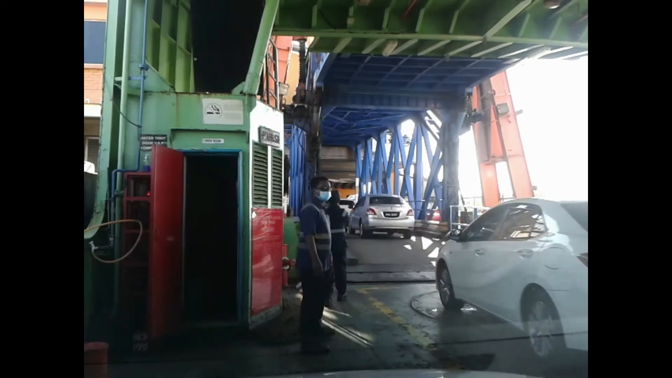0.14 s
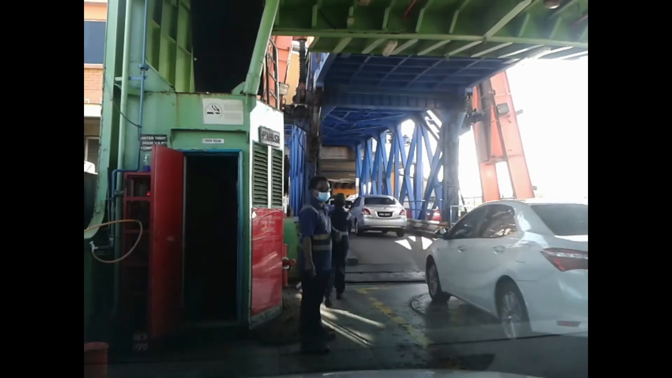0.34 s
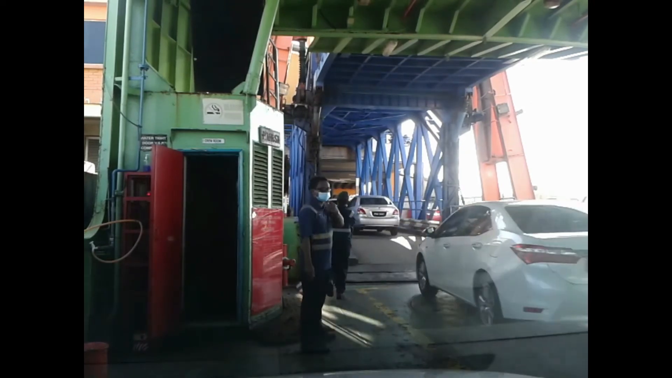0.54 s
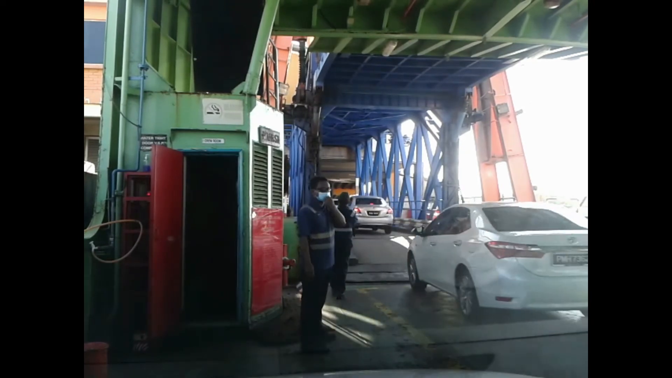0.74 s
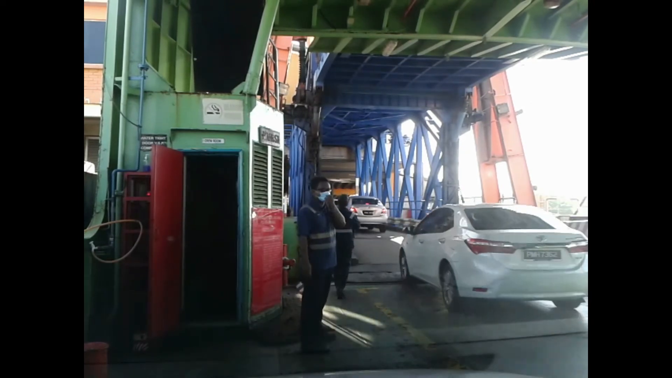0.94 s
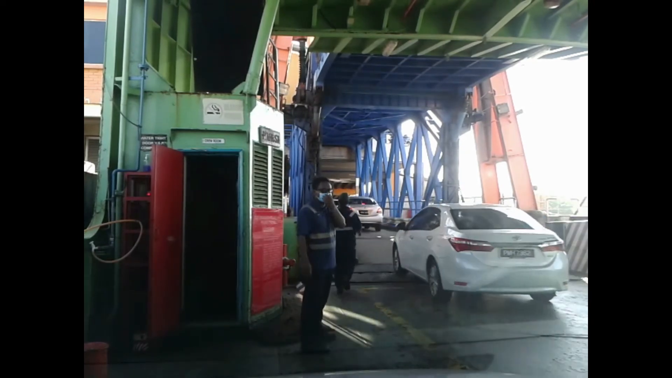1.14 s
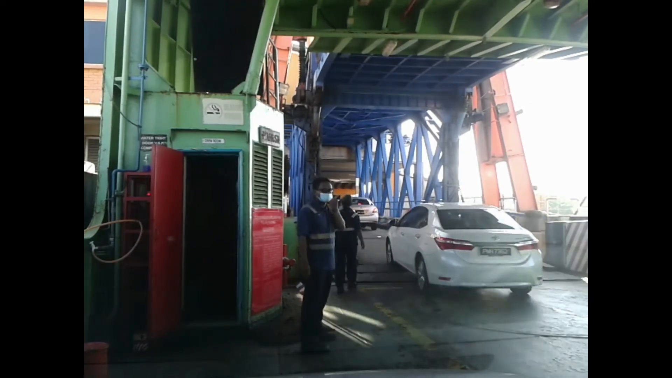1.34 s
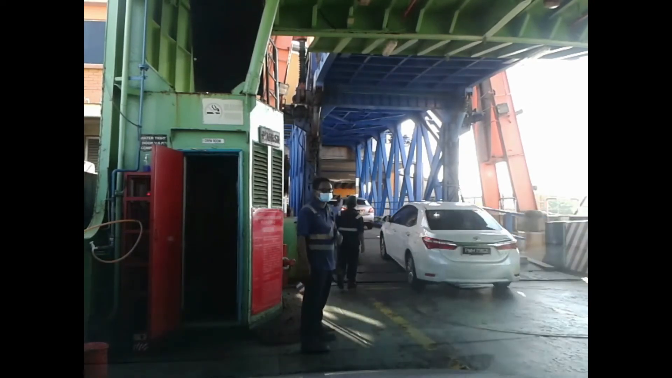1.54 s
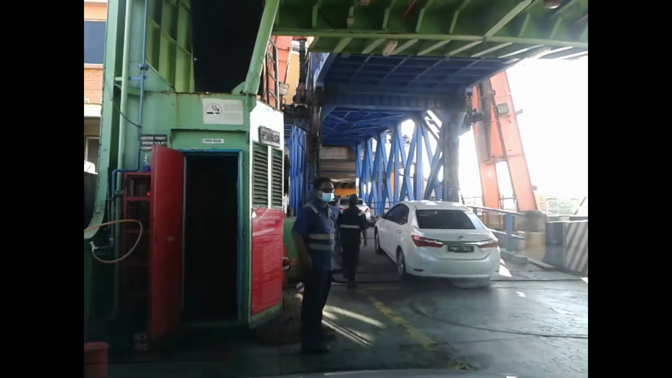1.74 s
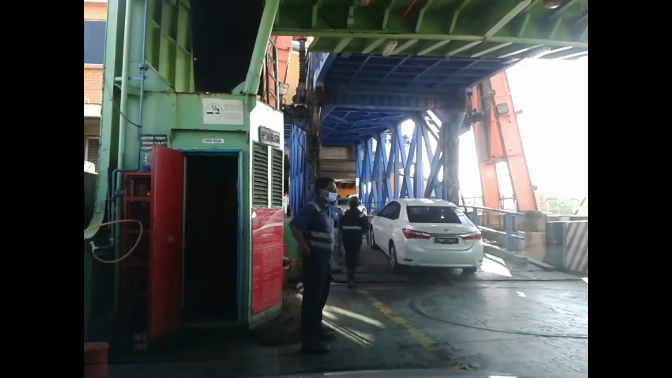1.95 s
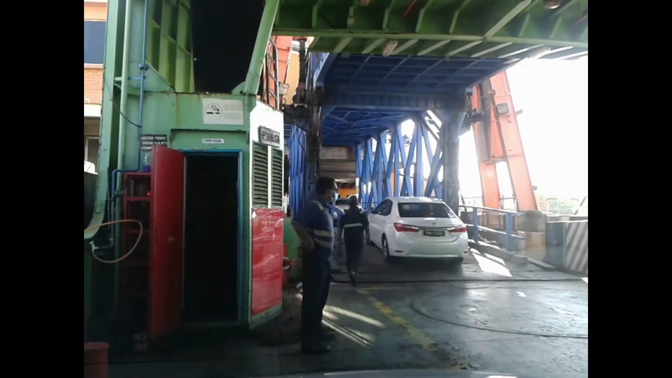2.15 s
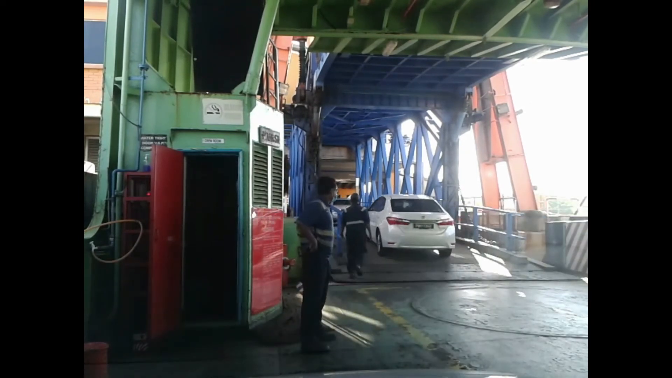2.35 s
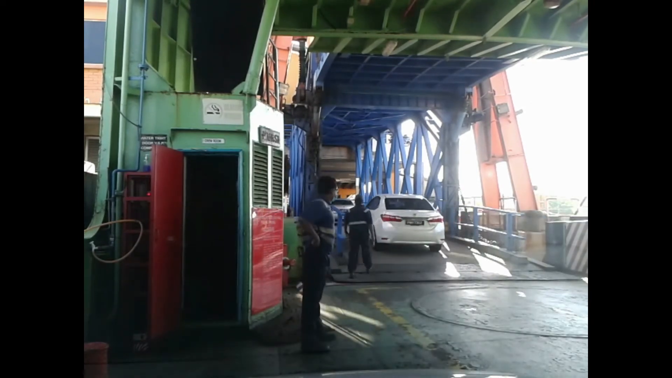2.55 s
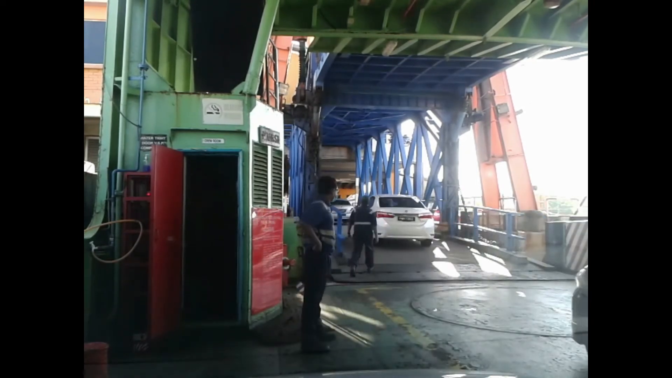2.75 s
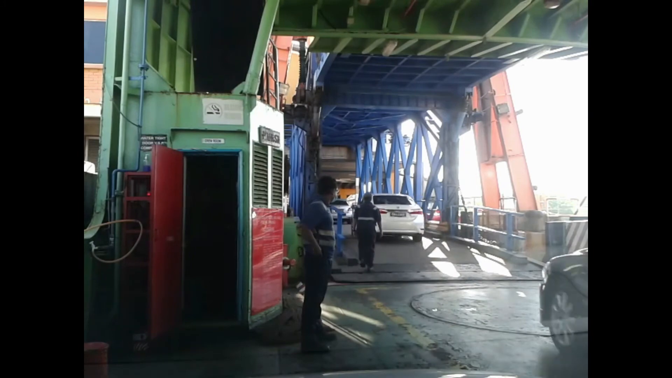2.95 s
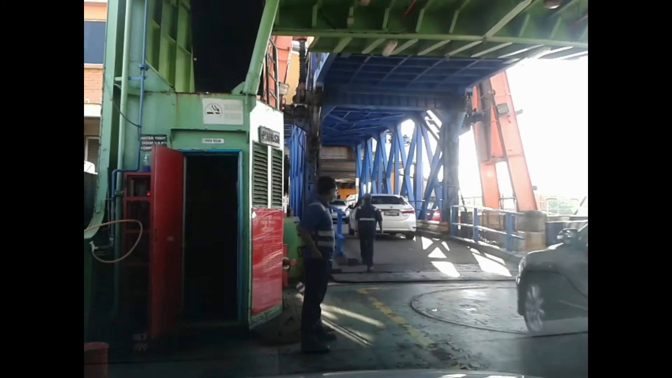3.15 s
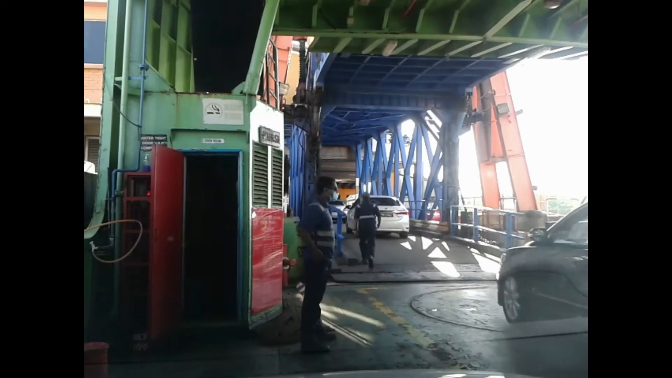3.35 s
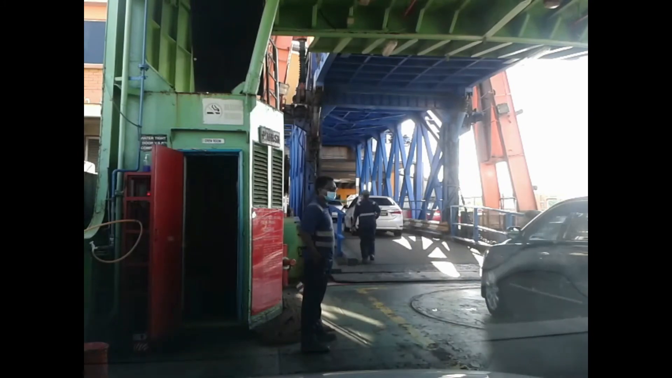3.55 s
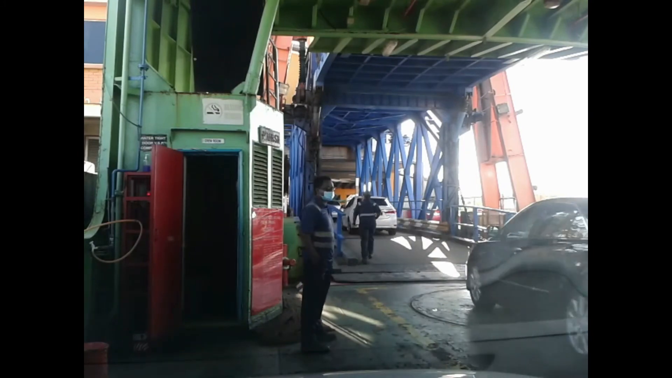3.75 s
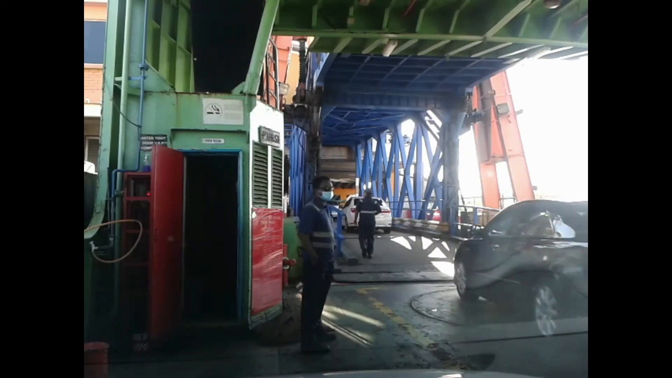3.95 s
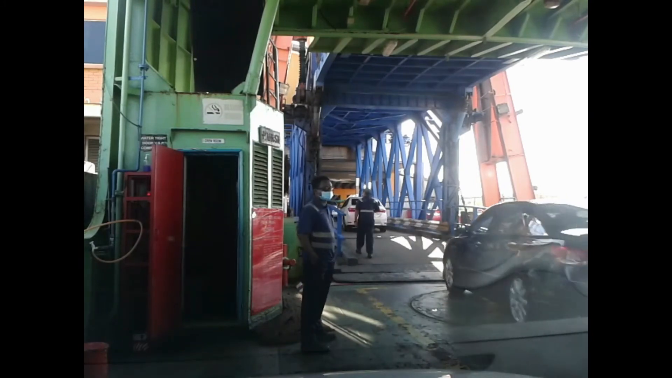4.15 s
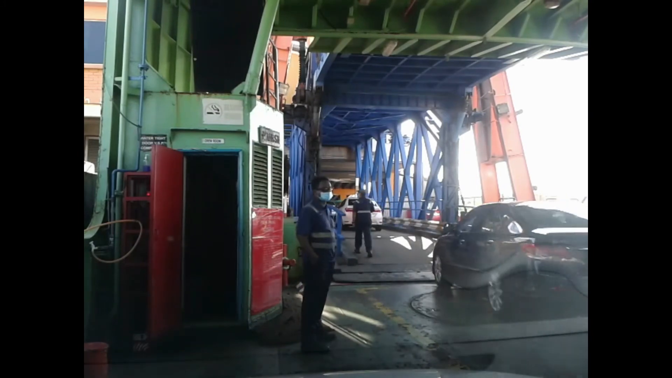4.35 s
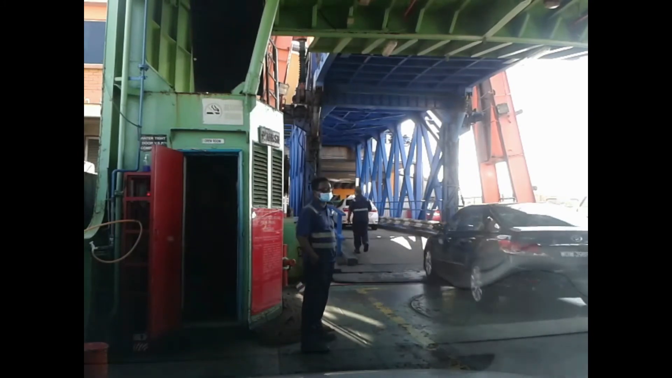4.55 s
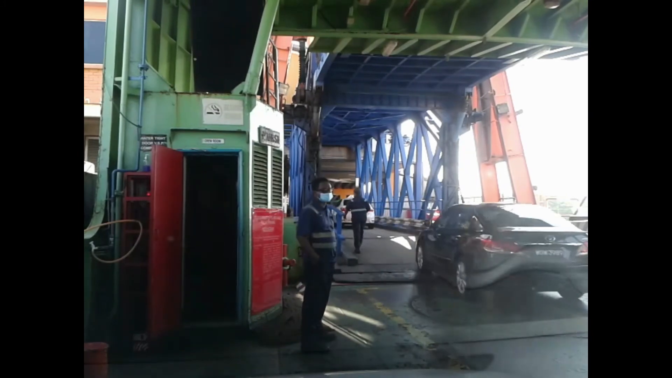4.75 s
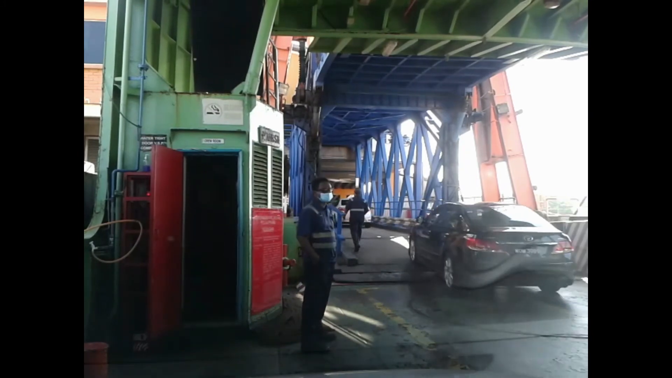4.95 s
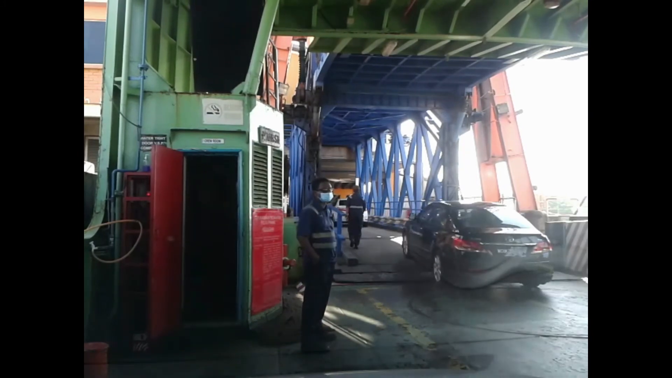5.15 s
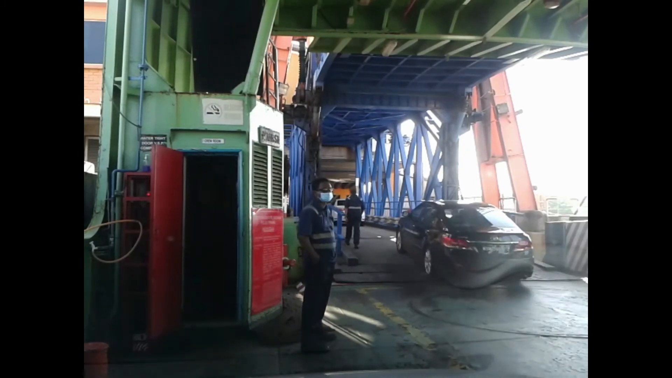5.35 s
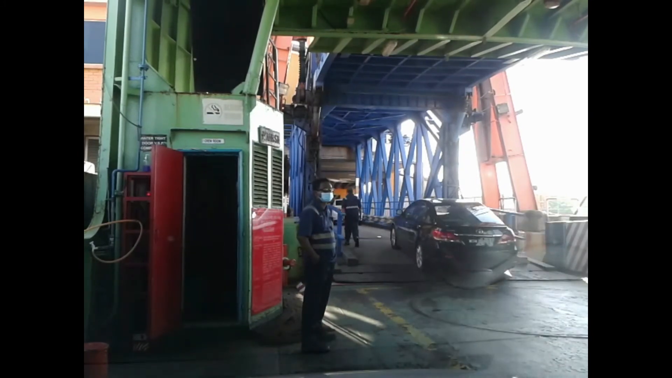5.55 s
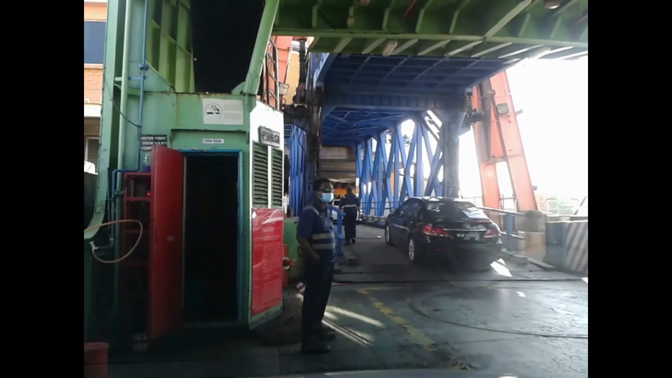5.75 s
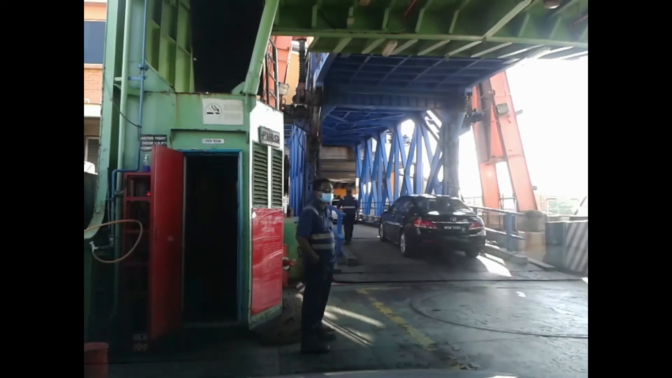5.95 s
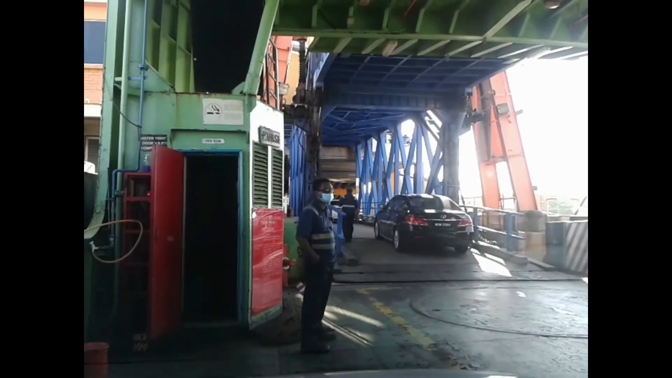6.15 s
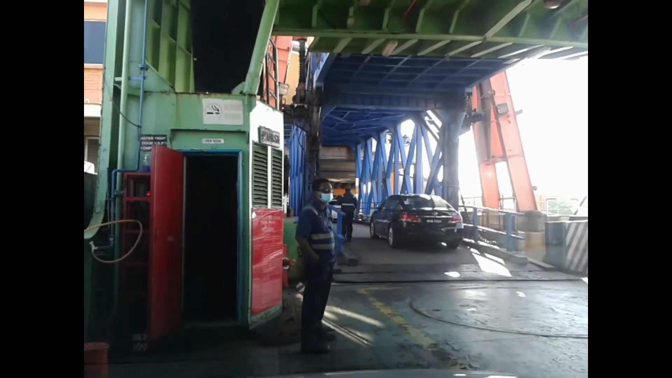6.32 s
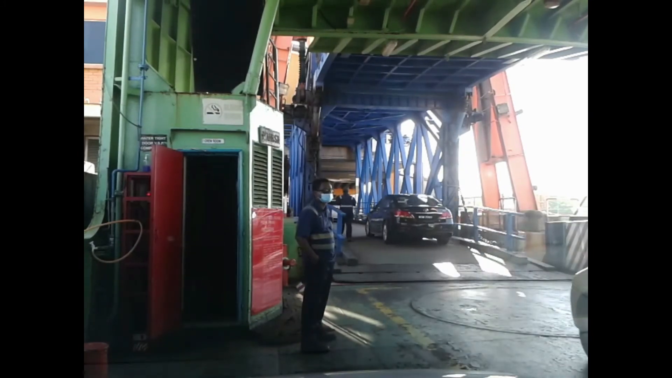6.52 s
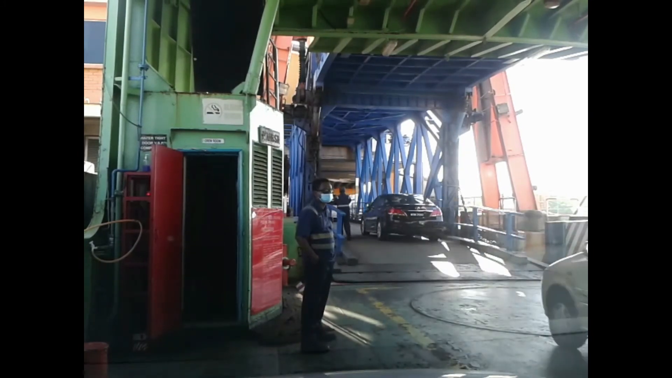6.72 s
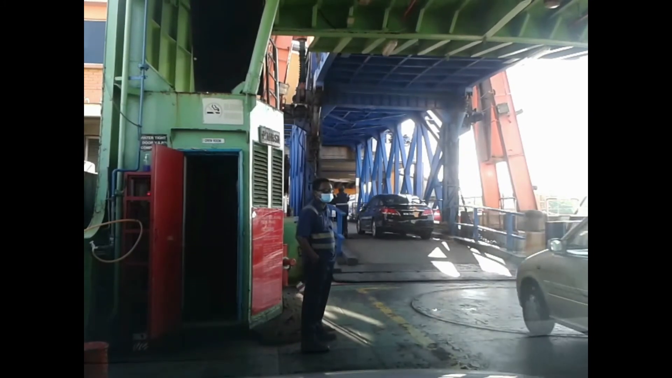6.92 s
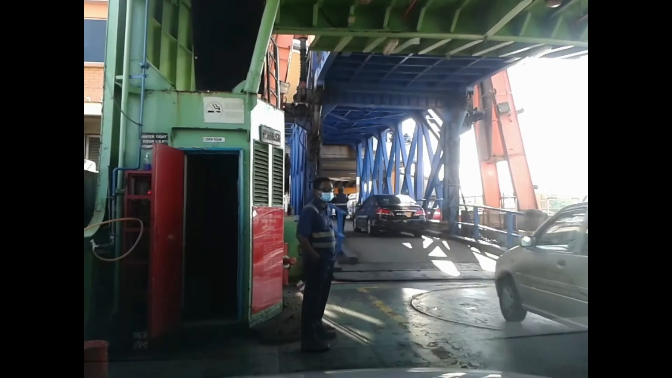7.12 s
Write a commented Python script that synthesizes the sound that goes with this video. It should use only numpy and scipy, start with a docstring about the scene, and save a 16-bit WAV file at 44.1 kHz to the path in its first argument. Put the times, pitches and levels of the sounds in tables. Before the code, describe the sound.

A deep, slightly wavering ship-engine drone around 116 Hz runs throughout, mixed with the dull rumble of idling cars and a faint hiss of air in a reverberant, half-open steel car deck. At 0.6 s there is a small clank, a tick and a short squeak. From 1.1 to 1.45 s a car's first axle slams loose ramp flaps: a dense chatter of clangs, rattles and boom with thin squeaks. The second axle follows from 1.8 to 2.2 s, with a hard bright snap at 2.05 s; smaller snaps come near 2.5 s. The ringing dies into hum, with a tiny clank at 3.4 s. A second car crosses at 4.6-5.0 s and 5.4-5.7 s, boomier, with faint high squeaks, while the drone swells around 5.2 s. After the metal fades, tyres scuff softly at 6.9 and 7.2 s, with a faint tick, as another car's rumble rises until the end at 7.3 s.

```python
"""A ship's engine drones first, over a rumble of idling cars and a hiss of air in a half-open car deck.
Then two cars roll off: each axle slams the loose steel flaps of the ramp, which chatter, boom and ring.
Trains of impulses strike decaying noise and decaying sines, the responses of the steel.
Sharp snaps, small clanks, short squeaks and tyre scuffs sound nearby.
The drone is a set of wavering sines; the rumble and the hiss are coloured noise."""
import sys
import numpy as np
from scipy import signal
from scipy.fft import rfft, irfft, next_fast_len
from scipy.io import wavfile
from scipy.ndimage import uniform_filter1d

SR = 44100
rng = np.random.default_rng(int(sys.argv[2]) if len(sys.argv) > 2 else 0)


def digitize_waveform(pressure):
    """Quantize a signal to 16-bit integers and store it at the path in sys.argv[1].

    Rows of a 2-D input are taken as channels; values are limited to [-1, 1].
    """
    field = np.atleast_2d(pressure).T
    bounded = np.clip(field, -1, 1)
    quanta = np.round(bounded * 32767).astype(np.int16)
    wavfile.write(sys.argv[1], SR, quanta)


N = 321048
TIME = np.arange(N) / SR


def from_db(db):
    """Level to amplitude: 20 dB is a factor of ten."""
    return 10 ** (np.asarray(db) / 20)


def rms_one(x):
    """Normalises the mean power to 1."""
    return x / np.sqrt(np.mean(x ** 2) + 1e-20)


def unit_energy(x):
    """Normalises the total energy to 1."""
    return x / np.sqrt(np.sum(x ** 2) + 1e-20)


def at_hz(points, hz):
    """Interpolates a table linearly on a log-frequency axis."""
    table = np.array(points)
    return np.interp(np.log(hz + 1e-9), np.log(table[:, 0]), table[:, 1])


def butter(x, hz, kind, order=2):
    """Butterworth filtering: a maximally flat passband."""
    return signal.sosfilt(signal.butter(order, hz, kind, fs=SR, output="sos"), x)


def add(track, s, sound):
    """Superposition: mixes a sound into the track from time s."""
    start = round(s * SR)
    track[start:start + len(sound)] += sound[:N - start]


def convolve(force, response):
    """Linear response: each impulse of the force starts a copy of the body's response."""
    return signal.fftconvolve(force, response)[:N]


def drift(rate_hz):
    """Low-passed noise: a smooth random wander of rms 1, slower for a lower rate."""
    size = N // 40   # a coarse time grid is enough
    hz = np.fft.rfftfreq(size, 40 / SR)
    slow = irfft(rfft(rng.standard_normal(size)) / (1 + (hz / rate_hz) ** 2))
    return np.interp(TIME, np.linspace(0, N / SR, len(slow)), rms_one(slow))


def noise(spectrum):
    """Spectral shaping: noise of a tabulated colour, falling away beyond the table's ends; rms 1."""
    size = next_fast_len(N)
    hz = np.fft.rfftfreq(size, 1 / SR)
    lowest_hz, highest_hz = spectrum[0][0], spectrum[-1][0]
    top_end = 1 / (1 + (hz / highest_hz / 1.1) ** 8)
    bottom_end = 1 / (1 + (.7 * lowest_hz / (hz + 1)) ** 4)
    colour = from_db(at_hz(spectrum, hz)) * top_end * bottom_end
    white = rfft(rng.standard_normal(size))
    return rms_one(irfft(white * colour, size)[:N])


def decay(t60, length_s):
    """Exponential damping: the level falls 60 dB in t60 seconds."""
    return from_db(-60 * TIME[:round(length_s * SR)] / t60)


def chatter(per_s, t60, spread_db):
    """Repeated impact: a first contact, then a dying run of randomly timed, uneven bounces; energy 1."""
    fade = decay(t60, .5)
    touches = rng.random(len(fade)) < per_s / SR
    strength = from_db(spread_db * np.clip(rng.standard_normal(len(fade)), -2, 2))
    force = touches * strength * rng.choice([-1, 1], len(fade))
    force[0] = from_db(spread_db)
    return unit_energy(force * fade)


# Wheels slam the flaps, two axles of two cars; levels are relative, before the gains in ramp():
# (time [s], strength [dB], clang over the soft part [dB], rattle over the soft part [dB],
#  deck boom [dB], flap note [Hz], note level [dB])
WHEEL_BLOWS = [ (1.086, -31, 7.5, -9.5, -28, 1500, -30), (1.100, -29, 11.5, 6.5, -42, 575, -19.5),
               (1.134, -24.5, -3, 4, -30, 396, -23), (1.178, -29, 3.5, 7.5, -28, 1027, -24),
               (1.213, -21.5, -13, -0.5, -40, 550, -24), (1.240, -27.5, -7, -2, -36, 275, -20),
               (1.263, -23, -6, -2, -36, 472, -23), (1.322, -20.5, -4, -3, -27, 533, -19),
               (1.354, -26, -4.5, -6, -39, 535, -26.5), (1.392, -32, -2, -8, -31.5, 270, -25),
               (1.440, -30, 0, 2, -45, 269, -28), (1.818, -32.5, 6, -11, -32, 573, -28),
               (1.840, -32.5, 6.5, -14, -33.5, 583, -29), (1.868, -30.5, 8, -6.5, -40, 398, -27),
               (1.900, -28.5, -0.5, 0, -34.5, 1480, -29), (1.925, -30.5, 6.5, 2.5, -38, 515, -24),
               (1.957, -29, 1.5, 1, -34, 275, -26), (1.987, -32.5, 13, 1, -33, 519, -22),
               (2.001, -23, -10.5, -21, -28.5, 563, -22), (2.047, -26, 1, -18, -31.5, 252.3, -20),
               (2.092, -28, -3.5, -20, -26, 533, -27), (2.152, -29.5, -6.5, -16, -27.5, 251, -23),
               (2.222, -29.5, -1, -15, -27, 246, -15), (4.622, -31.5, 11, -14, -25.5, 1474, -32),
               (4.655, -28.5, 8.5, 9.5, -32.5, 632, -22), (4.682, -28, 7, 1.5, -30, 399, -22),
               (4.735, -22, -2.5, -5, -26.5, 571, -17), (4.757, -26, -4, 1, -36, 405, -27),
               (4.788, -23.5, -8, -7, -31, 554, -28), (4.828, -26.5, 5.5, -1.5, -27.5, 560, -30),
               (4.872, -29, -1.5, -15, -24.5, 600, -32), (4.938, -27, -7.5, -5, -36, 267, -25),
               (4.976, -35.5, -13, -9, -24, 257, -22), (5.402, -36, 12, -8.5, -40, 538, -27),
               (5.438, -32.5, 15, 3, -16.5, 1262, -28), (5.472, -29.5, 8, 6, -32, 991, -30),
               (5.510, -28.5, 4.5, 3.5, -21, 964, -26), (5.536, -30.5, 0, -4, -26, 958, -23),
               (5.580, -26, -2, 0.5, -30, 545, -19), (5.607, -29.5, 5, 2.5, -30, 257, -28),
               (5.643, -33, -5, -9, -21.5, 253, -30), (5.686, -35, -6, -4, -31.5, 580, -31),
               (5.722, -34, 2.5, -4, -34, 245, -26)]
# Flap modes that stand out: (frequency [Hz], share of energy [dB], decay time T60 [s])
FLAP_MODES = [(262, -7, .5), (402, -4, .5), (500, -8, .4), (535, -3.5, .45), (572, -6.5, .45),
              (635, -4, .55), (835, -10, .5), (910, -10, .4), (966, -6.5, .5), (1040, -6, .6),
              (1135, -12, .6), (1259, -9, .65), (1472, -12, .6), (1518, -14, .6), (1605, -16, .7),
              (2155, -18, .7), (2390, -27, .6), (2810, -26, .7), (3154, -25, .7), (3770, -31, .6),
              (4250, -27, .7), (5048, -25, .8), (6200, -26, .5), (7235, -25, .6)]
# Modes of the deck under the flaps: (frequency [Hz], share of energy [dB], decay time T60 [s])
DECK_MODES = [(60, -8, 0.71), (87, -7.5, 0.46), (108.3, -6.5, 1), (127.45, 4.5, 0.81), (143.4, -3, 0.36),
              (155.5, -4, 1), (182.7, -3.5, 0.88), (192.4, -13, 0.57), (198.8, -1.5, 1), (240.2, -12, 0.36),
              (270.1, -2, 0.73)]
FLAP_COUNT, FLAP_DETUNE = 4, .004   # detune: largest shift of the modes, as a fraction of frequency


def ramp():
    """Impact excitation: blows make the flaps chatter, clang, rattle and sound a note, and boom the deck."""
    flaps, weight, notes = np.zeros((FLAP_COUNT, N)), np.zeros(N), np.zeros(N)
    for k, blow in enumerate(WHEEL_BLOWS):
        s, strength_db, clang_db, rattle_db, boom_db, note_hz, note_db = blow
        force = edge_echo(chatter(per_s=130, t60=.15, spread_db=7))
        soft = butter(force, 740, "low", order=1)
        firm = butter(force, 3000, "low", order=1)
        loose_edges = butter(chatter(per_s=200, t60=.26, spread_db=3.0), 2700, "high", order=1)
        contact = soft + from_db(clang_db) * (firm - soft) + from_db(rattle_db) * loose_edges
        add(flaps[k % FLAP_COUNT], s, from_db(strength_db) * contact)
        add(weight, s, from_db(boom_db) * chatter(per_s=240, t60=0.44, spread_db=6.5))
        add(notes, s, from_db(note_db) * flap_note(note_hz))

    # no two flaps ring alike: each has its own crowd of modes and its own tuning
    clang = from_db(39) * sum(convolve(flap, crowded_modes()) for flap in flaps)
    tunings = 1 + FLAP_DETUNE * np.linspace(-1, 1, FLAP_COUNT)
    ring = from_db(28.5) * sum(convolve(flap, ringing(FLAP_MODES, tuning))
                               for flap, tuning in zip(flaps, tunings))
    boom = from_db(36.0) * convolve(weight, ringing(DECK_MODES))
    return butter(clang + ring + notes + boom, 8400, "low", order=10)


EDGE_ECHO_S, EDGE_ECHO_SHARE = .004, 0.55   # middle delay, amplitude beside the direct force


def edge_echo(force):
    """Comb filtering: the bending wave returns from the flap's edge, its delay varying with the spot struck."""
    lag = round(EDGE_ECHO_S * rng.uniform(.5, 1.5) * SR)
    returned = np.pad(force, (lag, 0))[:len(force)]
    return unit_energy(force + EDGE_ECHO_SHARE * returned)


NOTE_ATTACK_S, NOTE_T60_S = .028, .28   # both are 60 dB times
NOTE_WAVER_HZ = 9.8   # rms


def flap_note(hz):
    """Free vibration: the span left free by the wheel rings at its own pitch, unsteady as the load moves."""
    fade = decay(NOTE_T60_S, .5) * (1 - decay(NOTE_ATTACK_S, .5))
    waver = rms_one(butter(rng.standard_normal(len(fade)), 60, "low"))
    pitch = hz + NOTE_WAVER_HZ * waver
    return fade * np.sin(2 * np.pi * (np.cumsum(pitch) / SR + rng.random()))


# Colour of the flaps' crowded modes: (frequency [Hz], relative density [dB per Hz])
PLATE_COLOUR = [(150, 14.5), (250, 4.5), (340, 1), (550, 3.5), (720, -0.5), (830, -4.5), (990, -2.5),
                (1300, -10.5), (1520, -11), (2100, -17.5), (3400, -26.5), (5200, -24.5), (6400, -19),
                (7800, -28), (8400, -73.5)]
# How long the crowded modes ring: (frequency [Hz], decay time T60 [s])
PLATE_DECAY = [(150, 1.22), (600, 0.99), (2000, 0.74), (7000, 0.33)]


def crowded_modes():
    """High modal density: a big plate inside steel walls responds as noise, dying octave by octave."""
    wash = noise(PLATE_COLOUR)[:2 * SR]
    spectrum, hz = rfft(wash), np.fft.rfftfreq(len(wash), 1 / SR)
    edges = 90 * 2. ** np.arange(8)   # octaves, Hz
    # each contact is first heard straight from the flap
    direct = 1.76 * decay(0.066, 2) * (1 - decay(0.008, 2))
    out = 0
    for low, high in zip(edges, edges[1:]):
        centre = np.sqrt(low * high)
        band = irfft(spectrum * ((hz >= low) & (hz < high)))
        # the treble arrives mostly by reflection, a little late
        build_up = 1 - decay(0.029 + 0.0082 * centre / 5000, 2)
        tail = build_up * decay(at_hz(PLATE_DECAY, centre), 2)
        out = out + band * unit_energy(direct / (1 + (centre / 2000) ** 2) + tail)
    return unit_energy(out)


def ringing(modes, tuning=1):
    """Modal superposition: a few lone modes, each a decaying sine, sum to the body's response."""
    t = TIME[:2 * SR]
    out = 0
    for k, (hz, db, t60) in enumerate(modes):
        mode = unit_energy(decay(t60, 2) * np.sin(2 * np.pi * hz * tuning * t))
        out = out + (-1) ** k * from_db(db) * mode   # neighbours have opposite sign
    return unit_energy(out)


# Small clanks of loose steel, before the gain in clanks(): (time [s], relative level [dB])
CLANK_BLOWS = [(0.636, -25), (3.398, -30.5)]
# Colour of the clanks: (frequency [Hz], relative density [dB per Hz])
CLANK_COLOUR = [(200, -15), (350, 12.5), (600, -7.5), (950, -1), (1400, -6.5), (2400, -14.5), (3500, -24),
                (6300, -8), (8000, -34)]


def clanks():
    """Strong damping: light knocks of steel on steel excite a noise response that dies quickly."""
    force = np.zeros(N)
    for s, db in CLANK_BLOWS:
        # the negative spread makes the first contact a soft one
        add(force, s, from_db(db) * chatter(per_s=420, t60=0.056, spread_db=-2.5))
    body = noise(CLANK_COLOUR)[:SR] * decay(0.21, 1) * (1 - decay(0.0032, 1))
    return from_db(30.5) * convolve(force, unit_energy(body))


# Sharp snaps, before the body and gain in snaps():
# (time [s], relative level [dB], low-pass corner of the force [Hz])
SNAP_BLOWS = [(.633, -33.5, 7600), (.655, -42, 7600), (2.042, -24, 12200), (2.045, -16.5, 12200),
              (2.051, -16, 12300), (2.055, -25, 12400), (2.069, -25.5, 12000), (2.477, -39.5, 8700),
              (2.571, -28.5, 8850), (2.577, -25.5, 11000), (3.4, -45, 7500), (7.157, -43, 7400)]
# Resonances of what snaps: (frequency [Hz], bandwidth [Hz], relative level [dB])
SNAP_RESONANCES = [(2250, 960, -8), (3500, 270, -0.5), (4560, 2200, -8), (6560, 300, 11.5), (7000, 930, 2),
                   (12000, 460, 1.5)]


def snaps():
    """Source and resonator: a crack with close reflections and a faint deck tail drives a small hard body."""
    force = np.zeros(N)
    for s, db, top_hz in SNAP_BLOWS:
        tail = unit_energy(rng.standard_normal(SR // 2) * decay(0.17, .5))
        crack = chatter(per_s=2200, t60=.045, spread_db=5)   # dense impulses: the close reflections
        add(force, s, from_db(db) * butter(crack + from_db(-16) * tail, top_hz, "low", order=18))
    body = 0
    for k, (hz, width_hz, db) in enumerate(SNAP_RESONANCES):
        resonance = signal.lfilter(*signal.iirpeak(hz, hz / width_hz, fs=SR), force)
        body = body + (-1) ** k * from_db(db) * resonance
    return from_db(35.5) * butter(butter(body, 1600, "high"), 6240, "low", order=3)


# Thin squeaks of rubbing steel: (time [s], length [s], pitch [Hz], rms level at the height of the swell [dB])
STEEL_SQUEAKS = [(.58, .19, 1606, -41), (1.33, .13, 5046, -47), (1.465, .15, 5046, -49),
                 (1.32, .16, 4235, -52.5), (1.34, .14, 3150, -51), (1.37, .16, 2159, -50.5),
                 (4.78, .19, 5046, -53), (4.78, .12, 4245, -56), (5.53, .24, 5046, -55),
                 (1.245, .1, 10900, -67), (1.44, .13, 11000, -66), (4.68, .17, 10900, -64.5),
                 (5.49, .27, 10900, -64)]


def squeaks():
    """Friction-driven tones: brief squeals swell and fade about one pitch, trembling slightly."""
    out = 0
    for s, length_s, hz, db in STEEL_SQUEAKS:
        progress = np.clip((TIME - s) / length_s, 0, 1)
        swell = np.sqrt(np.maximum(np.sin(np.pi * progress), 0))
        pitch = hz + 9 * drift(80)
        tone = np.sqrt(2) * np.sin(2 * np.pi * np.cumsum(pitch) / SR)
        out = out + from_db(db + 2.7 * drift(35)) * swell * tone
    return out


# The next car's tyres scuff the deck: (time [s], rms level at the peak [dB])
TYRE_SCUFFS = [(6.94, -47.5), (7.17, -52)]
# Colour of a scuff: (frequency [Hz], relative density [dB per Hz])
SCUFF_COLOUR = [(1500, -10), (2400, 11), (3500, -3), (6500, -2), (8000, -38)]
SCUFF_ATTACK_S, SCUFF_RELEASE_S = 0.016, 0.15   # time constants


def scuff():
    """Sliding friction: rubber turning on painted steel makes noise that swells quickly and dies away."""
    grip = 0
    for s, db in TYRE_SCUFFS:
        rise, fall = (s - TIME) / SCUFF_ATTACK_S, (TIME - s) / SCUFF_RELEASE_S
        grip = grip + from_db(db) * np.exp(-np.maximum(rise, fall))
    return grip * from_db(1.0 * drift(40)) * noise(SCUFF_COLOUR)


# Level of the engine's main drone: (time [s], rms level [dB])
DRONE_LEVEL = [(0, -25.5), (1.0, -25.5), (2.3, -24.5), (3.1, -27.5), (4.3, -26), (5.2, -22), (6.2, -25.5),
               (7.28, -25.5)]
# Lesser tones of the ship's engine: (frequency [Hz], rms level [dB], depth of waver [0-1])
ENGINE_TONES = [(46.8, -42, 0.5), (57.5, -42.5, 0.8), (63.8, -37.5, 0.8), (149, -32.5, 0.46),
                (174.6, -35.5, 0.5), (197.6, -34, 0.54), (246, -50, 0.8)]
DRONE_HZ, DRONE_WAVER = 116.3, 0.41


def engine():
    """Random modulation: low tones waver in strength and phase on their way through the hull."""
    drone_db = np.interp(TIME, *np.transpose(DRONE_LEVEL))
    out = 0
    for hz, db, waver in [(DRONE_HZ, drone_db, DRONE_WAVER), *ENGINE_TONES]:
        phase = 2 * np.pi * (hz * TIME + rng.random()) + waver * drift(5.0)
        strength = np.exp(0.8 * waver * drift(8.3))
        out = out + from_db(db) * rms_one(strength * np.sin(phase))
    return out


# Colour of the car deck's rumble: (frequency [Hz], relative density [dB per Hz])
RUMBLE_COLOUR = [(25, -39.5), (38, -24), (58, -11), (82, -2.5), (105, -4), (130, 2), (165, -3.5), (195, -4),
                 (250, -5.5), (330, -16), (400, -13), (470, -15), (620, -12.5), (680, -16), (780, -20.5),
                 (930, -18.5), (1045, -20.5), (1110, -26), (2000, -45.5)]
# Colour of the air hiss: (frequency [Hz], relative density [dB per Hz])
AIR_COLOUR = [(700, 1), (1300, 9), (1800, 1), (2400, -1), (3400, -7.5), (5000, -10), (5800, -4), (6500, 5),
              (7100, -1.5), (8000, -12.5), (9000, -45.5)]
# Cars rolling by: (time when loudest [s], rise of the rumble [dB])
CAR_PASSES = [(1.6, 2), (5.2, 0.1), (7.3, 2.5)]
PASS_WIDTH_S, PASS_HISS_SHARE = 0.19, 0.63   # half-width; the hiss takes a share of the rise in dB
RUMBLE_DB, HISS_DB = -26, -42   # rms between passes


def car_deck():
    """Incoherent sum: idling cars and machinery blur into rumble under hissing air; both swell as cars pass."""
    swell_db = sum(db / (1 + ((TIME - s) / PASS_WIDTH_S) ** 2) for s, db in CAR_PASSES)
    rumble = from_db(RUMBLE_DB + swell_db + .5 * drift(2.5)) * noise(RUMBLE_COLOUR)
    hiss = from_db(HISS_DB + PASS_HISS_SHARE * swell_db + .5 * drift(32)) * noise(AIR_COLOUR)
    return rumble + hiss


def scene():
    """Superposition of all sources, in one channel."""
    return (ramp() + clanks() + snaps() + squeaks() + scuff() + engine() + car_deck())[None]


CUTOFF_HZ = 13400   # from here up the treble is 70 dB down


def record(dry):
    """Gain reduction and band-limiting: a fast limiter holds peaks down; the deepest bass and the top are cut."""
    x = butter(dry, 33, "high", order=4)
    ceiling_db = -5.5
    over = np.maximum(20 * np.log10(np.abs(x) + 1e-9) - ceiling_db, 0)
    fall = 150 * TIME   # release, dB per s
    held = np.maximum.accumulate(over + fall, axis=-1) - fall
    x = x * from_db(-uniform_filter1d(held, size=45))   # smoothed over about 1 ms
    return signal.sosfilt(signal.cheby2(12, 70, CUTOFF_HZ, fs=SR, output="sos"), x)


dry = scene()
out = record(dry)
digitize_waveform(out)
```